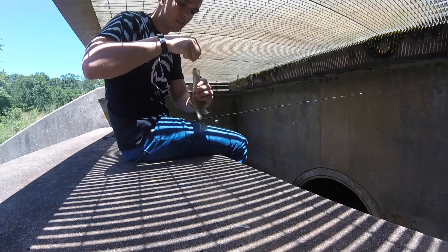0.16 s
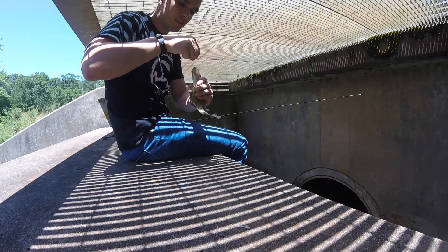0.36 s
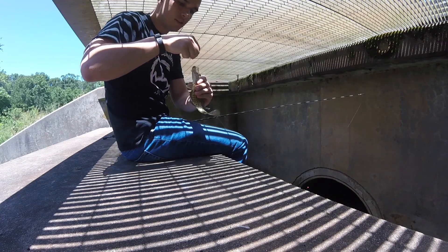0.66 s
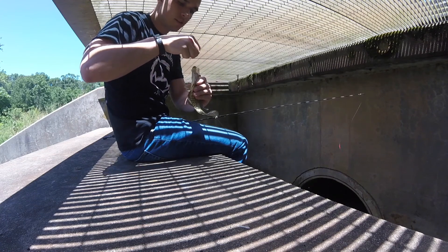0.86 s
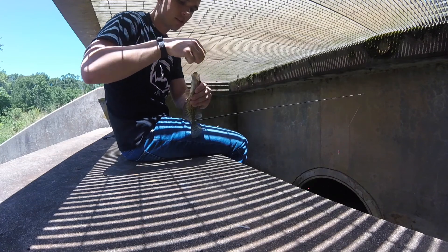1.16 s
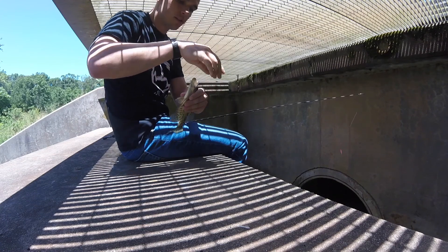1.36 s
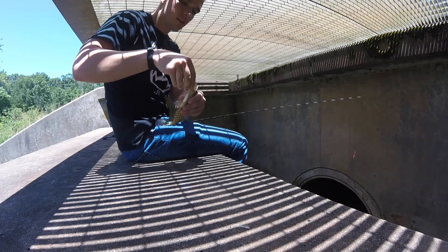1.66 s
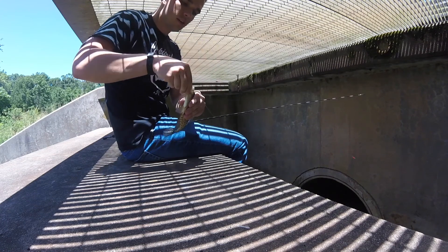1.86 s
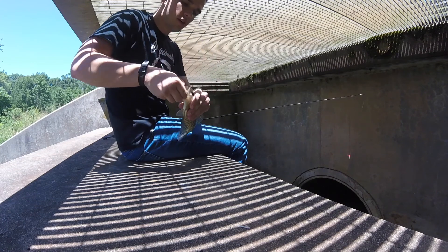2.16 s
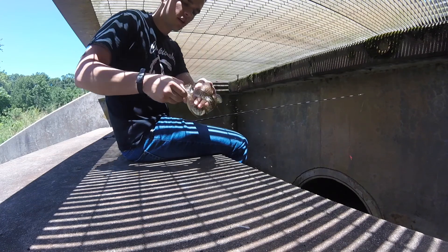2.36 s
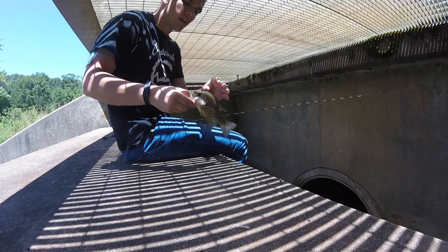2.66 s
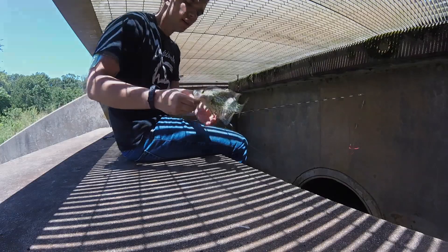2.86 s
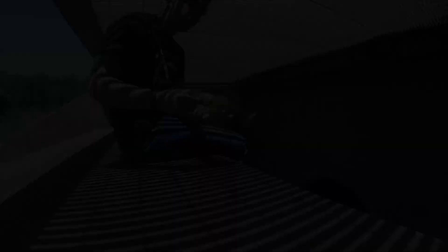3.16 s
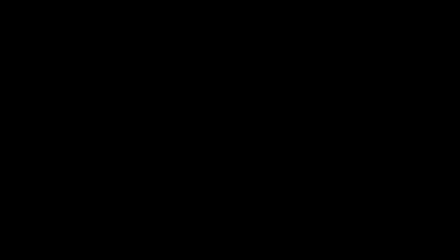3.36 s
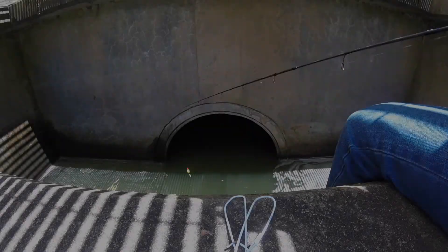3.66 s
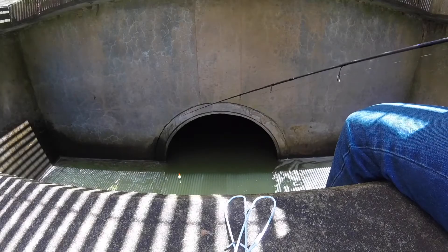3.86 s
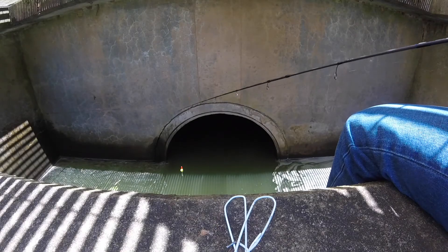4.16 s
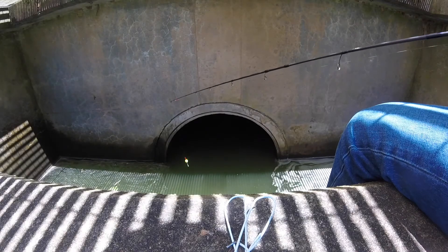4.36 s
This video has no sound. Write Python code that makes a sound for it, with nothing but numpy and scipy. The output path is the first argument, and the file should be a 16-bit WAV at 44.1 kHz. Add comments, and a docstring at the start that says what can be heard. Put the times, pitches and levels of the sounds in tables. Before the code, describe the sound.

From the top of a concrete wall, a steady low rush of water is heard churning into a pool, with soft spray and a hollow, wavering throb from a culvert. Near the end the sound crossfades, passing a tiny faint tone and a momentary drop in bass. It settles facing the pipe opening, where the same water is a little louder and the boom and hum come forward.

```python
"""High water pours through a concrete overflow culvert into a pool: a dull, even wash of churning and
bubbles under a faint hiss of spray. Turbulence rings the air in the pipe and its chamber, and the flow
keeps a hollow throb, boom and hum sounding. We listen from the top of the wall, then cross-fade to a
spot facing the pipe's mouth; midway through the fade a brief, faint tone sounds and the bass dips."""
import sys
import numpy as np
from scipy import signal
from scipy.fft import rfft, irfft
from scipy.io import wavfile

SR = 44100
rng = np.random.default_rng(int(sys.argv[2]) if len(sys.argv) > 2 else 0)


def pcm_store(signal):
    """Save signal as 16-bit PCM."""
    levels = np.round(np.clip(np.atleast_2d(signal), -1, 1) * 32767)
    wavfile.write(sys.argv[1], SR, levels.astype(np.int16).T)


N = 199552
TIME = np.arange(N) / SR


def undb(db):
    """Decibels to gain."""
    return 10 ** (np.asarray(db) / 20)


def unit(x):
    """Scale to rms 1."""
    return x / np.sqrt(np.mean(x ** 2))


def automation(points):
    """Join (time_s, value) breakpoints with straight lines, holding the end values."""
    return np.interp(TIME, *np.transpose(points))


def shape(x, gain):
    """Filter by a gain that is a function of frequency."""
    return irfft(rfft(x) * gain(np.maximum(np.fft.rfftfreq(N, 1 / SR), 1)), N)


def colour(x, eq):
    """EQ through (freq_hz, gain_db) points, rolling off below the first; rms 1."""
    hz, db = np.transpose(eq)
    x = shape(x, lambda f: undb(np.interp(np.log(f), np.log(hz), db)))
    return unit(shape(x, lambda f: np.minimum(f / hz[0], 1) ** 2))


def drift(rate_hz):
    """Smooth random motion; rms 1."""
    return unit(shape(rng.standard_normal(N), lambda f: np.exp(-(f / rate_hz) ** 2)))


def water(low_hz, high_hz, bubbles_per_s, cycles, spread_db, bubble_db, flicker_db, flicker_hz, bands=14):
    """Bands of turbulence flicker independently, each with bubbles ringing at its centre pitch."""
    edges = np.geomspace(low_hz, high_hz, bands + 1)
    centres = np.sqrt(edges[:-1] * edges[1:])
    edges[0], edges[-1] = 0, SR  # the outer bands take the rest of the spectrum
    out = np.zeros(N)
    for lo, hi, hz in zip(edges, edges[1:], centres):
        births = rng.random(N) < bubbles_per_s / bands / SR
        strengths = undb(spread_db * np.minimum(rng.exponential(size=N), 4))
        age = TIME[:int(SR * cycles / hz) + 2]
        life = age * hz / cycles
        # a bubble's pitch climbs as it nears the surface
        ring = np.sin(2 * np.pi * hz * age * (1 + 0.053 * life)) * undb(-60 * life)
        bubbles = unit(signal.oaconvolve(births * strengths, np.diff(ring, prepend=0))[:N])
        churn = shape(rng.standard_normal(N), lambda f: (f >= lo) & (f < hi))
        share = np.sqrt(2 * hz * np.log(high_hz / low_hz) / bands / SR)  # of a flat spectrum
        out += (churn + undb(bubble_db) * share * bubbles) * undb(flicker_db * drift(flicker_hz))
    return out


def chamber(x, t60_s, wet_db):
    """Bare concrete walls smear each splash with a short tail."""
    tail = rng.standard_normal(SR) * undb(-60 * TIME[:SR] / t60_s)
    wet = irfft(rfft(x) * rfft(tail / np.linalg.norm(tail), N), N)
    return x + undb(wet_db) * wet


# Dark body of the churn, from the wall and facing the mouth: freq_hz, gain_db
WASH_WALL_EQ = [(35, -5), (54, -8.5), (92, 3.5), (170, -6), (245, -3.5), (310, -7), (500, -6), (700, -5.5),
                (880, -10), (1120, -17), (1250, -26.5), (1500, -35.5), (1750, -44), (3000, -66)]
WASH_MOUTH_EQ = [(35, -18), (55, -4), (115, 2), (165, -4), (260, -2), (320, -4), (500, -5), (700, -5),
                 (930, -8.5), (1120, -17.5), (1230, -24), (1480, -29), (1750, -42), (3000, -75)]


def wash(eq, level_db):
    """Water plunges steadily into the pool and folds in large bubbles."""
    plunge = water(150, 1800, bubbles_per_s=700, cycles=12.2, spread_db=2,
                   bubble_db=-4, flicker_db=1, flicker_hz=12.5)
    return undb(level_db) * colour(chamber(plunge, t60_s=0.29, wet_db=-14), eq)


# Sheen of the spray, from the wall and facing the mouth: freq_hz, gain_db
SPRAY_WALL_EQ = [(1200, -8), (1800, -10), (2150, -1), (2480, 0), (2800, -6.5), (3450, -2), (4400, -12),
                 (6000, -9), (6900, -10), (8000, -25), (8600, -20), (9400, -25), (10300, -20), (12600, -31)]
SPRAY_MOUTH_EQ = [(1200, -3.5), (1800, -3), (2250, 0), (2850, -1.5), (4050, -4), (4500, -12), (5500, -11),
                  (6000, -7), (7000, -11.5), (8000, -20), (9100, -25), (10200, -24.5), (11400, -27.5),
                  (12400, -58)]
# Small surges of splashing that ride the spray's level: time_s, gain_db
SPLASH_SURGES = [(0.0, -0.2), (0.25, -0.4), (0.47, 0.2), (1.15, -0.5), (1.35, 1.1), (1.65, -1.1),
                 (2.04, 1.2), (2.33, -0.7), (2.55, 0.5), (2.7, 0), (2.93, 0.4), (3.5, -0.4), (4.52, 0.1)]


def spray(eq, level_db):
    """Fine drops and tiny bursting bubbles merge into a soft hiss that follows the splashing."""
    fizz = water(1500, 12000, bubbles_per_s=4000, cycles=2.7, spread_db=2.5,
                 bubble_db=-9, flicker_db=0.68, flicker_hz=13)
    waver_db = 0.2 * drift(rate_hz=6)
    hiss = colour(chamber(fizz, t60_s=0.53, wet_db=-17), eq)
    return undb(level_db + automation(SPLASH_SURGES) + waver_db) * hiss


# Hollow resonances of pipe and chamber, before the trim: pitch_hz, width_hz, wall_db, mouth_db
AIR_MODES = [(40.7, 5.4, -46.5, -48), (102.7, 18, -44, -37.5), (140.5, 7.3, -41, -43),
             (183, 7.2, -41.5, -39), (214.5, 7.9, -42.5, -41.5), (240.7, 19.7, -40.5, -51),
             (275.5, 16.7, -45, -42), (351.7, 13.8, -40.5, -42), (494.3, 23, -42, -51.5),
             (759, 11.5, -53, -44.5), (826, 26.7, -43.5, -42), (890.2, 24, -44, -48.5),
             (924, 19.5, -52, -44), (998, 40, -53, -47)]


def hollow_ring(at_mouth, trim_db):
    """Turbulence rings the air in the pipe and between the walls; each spot hears its own balance."""
    out = np.zeros(N)
    for hz, width_hz, wall_db, mouth_db in AIR_MODES:
        turbulence = rng.standard_normal(N)
        mode = shape(turbulence, lambda f: (1 + .5j * hz / width_hz * (f / hz - hz / f)) ** -2)
        out += undb(mouth_db if at_mouth else wall_db) * unit(mode)
    return undb(trim_db) * out


def pipe_tone(pitch_hz, wander_hz, swells, trim_db):
    """The flow keeps one air mode of the pipe sounding, wandering in pitch as it swells and sinks."""
    phase = 2 * np.pi * np.cumsum(pitch_hz + wander_hz * drift(rate_hz=4.42)) / SR
    return unit(np.sin(phase)) * undb(automation(swells) + trim_db)


# Swells of the pipe's three tones, before the trim: time_s, level_db
THROB_SWELLS = [(0.0, -28.5), (0.11, -55), (0.29, -29.5), (0.44, -37), (0.52, -29.5), (0.98, -27),
                (1.06, -39), (1.12, -30.5), (1.69, -38.5), (2.03, -25), (2.18, -39.5), (2.72, -28),
                (3.13, -43), (3.22, -31), (3.3, -53), (3.35, -39), (3.94, -26), (4.18, -38), (4.47, -22.5),
                (4.52, -29)]
BOOM_SWELLS = [(0.0, -37), (0.31, -50), (0.45, -32), (0.52, -42), (0.6, -31.5), (0.94, -42), (1.18, -40),
               (1.23, -50), (1.78, -36), (1.87, -50), (1.95, -46), (2.8, -50), (2.86, -32), (3.07, -41),
               (3.27, -32), (3.41, -51), (3.51, -29), (3.68, -34.5), (3.79, -36), (3.9, -26.5), (3.99, -35),
               (4.09, -25), (4.15, -45), (4.24, -31.5), (4.34, -36.5), (4.39, -27.5), (4.45, -40),
               (4.52, -33)]
HUM_SWELLS = [(3.38, -52), (3.45, -32.5), (3.58, -41), (3.75, -31), (3.9, -44), (4.08, -36.5),
              (4.16, -39.5), (4.35, -30), (4.52, -41)]


def pipe_drone():
    """The pipe's strongest air modes stand near 1 : 3 : 9; boom and hum come forward at the mouth."""
    throb = pipe_tone(23.2, wander_hz=0.94, swells=THROB_SWELLS, trim_db=-0.14)
    boom = pipe_tone(72.5, wander_hz=1.25, swells=BOOM_SWELLS, trim_db=-0.6)
    hum = pipe_tone(211, wander_hz=2.84, swells=HUM_SWELLS, trim_db=-1.5)
    return throb + boom + hum


def brief_tone(start_s=3.368, peak_db=-28.5, pitch_hz=425, rise_hz_per_s=150, attack_s=0.022, t60_s=0.2):
    """A brief, faint tone, rising slightly, sounds in the wash midway through the fade."""
    age = np.maximum(TIME - start_s, 0)
    tone = np.sin(2 * np.pi * np.cumsum(pitch_hz + rise_hz_per_s * age) / SR)
    attack = np.minimum(age / attack_s, 1)
    decay = undb(-60 * np.maximum(age - attack_s, 0) / t60_s)
    return undb(peak_db) * attack * decay * tone


def bass_dip(x, centre_s=3.4, width_s=0.05, depth_db=-9, below_hz=145):
    """The low end ducks for a moment and comes back."""
    bass = shape(x, lambda f: 1 / (1 + (f / below_hz) ** 8))
    duck = undb(depth_db * np.exp(-((TIME - centre_s) / width_s) ** 2))
    return x + bass * (duck - 1)


def scene():
    """Two perspectives on the same water; their noise is unrelated, so it sags in the cross-fade."""
    wall = wash(WASH_WALL_EQ, level_db=-30.5) + spray(SPRAY_WALL_EQ, level_db=-52.5)
    wall += hollow_ring(at_mouth=False, trim_db=0.05)
    mouth = wash(WASH_MOUTH_EQ, level_db=-28.5) + spray(SPRAY_MOUTH_EQ, level_db=-52)
    mouth += hollow_ring(at_mouth=True, trim_db=-1)
    fade = automation([(2.96, 0), (3.806, 1)])
    bed = (1 - fade) * wall + fade * mouth
    return bass_dip(bed + pipe_drone() + brief_tone())[None]


def record(dry, top_hz=12700, fade_s=0.003):
    """A steep high cut, with tiny fades so the sound starts and stops without a click."""
    high_cut = signal.ellip(8, .2, 70, top_hz, fs=SR, output="sos")
    ends = np.clip(np.minimum(TIME, TIME[-1] - TIME) / fade_s, 0, 1)
    return ends * signal.sosfilt(high_cut, dry)


dry = scene()
out = record(dry)
pcm_store(out)
```